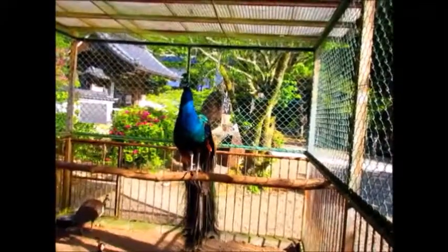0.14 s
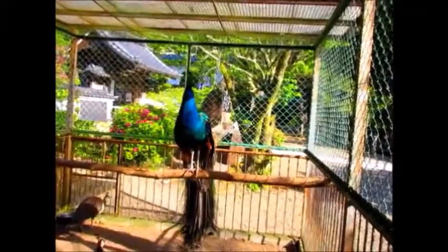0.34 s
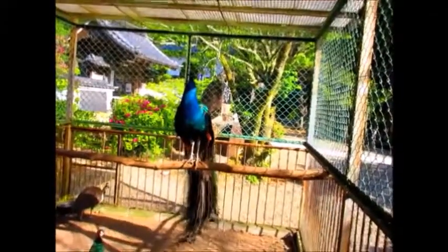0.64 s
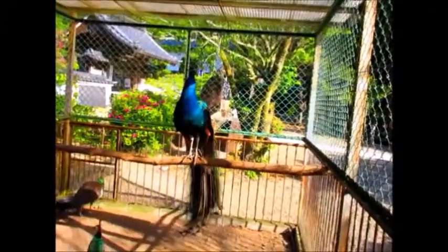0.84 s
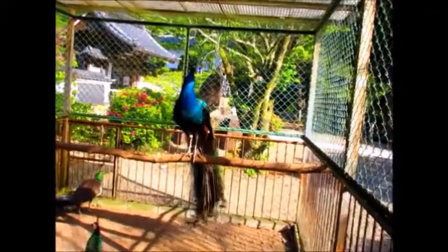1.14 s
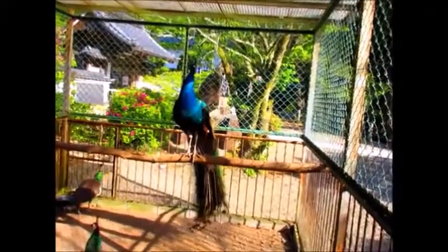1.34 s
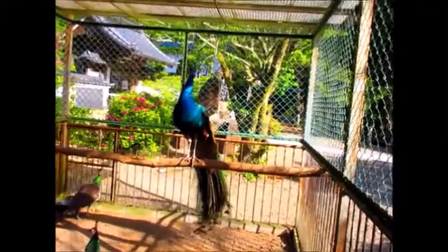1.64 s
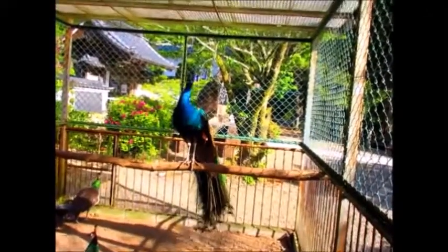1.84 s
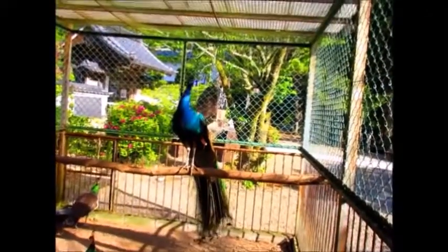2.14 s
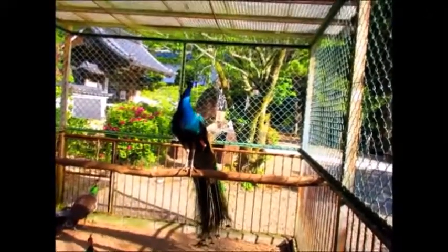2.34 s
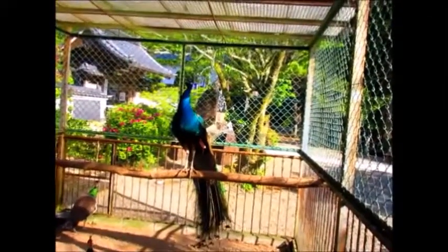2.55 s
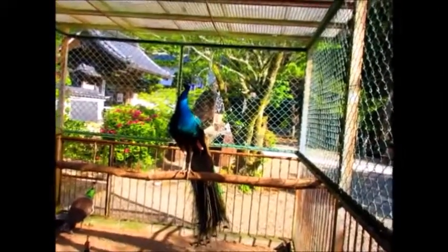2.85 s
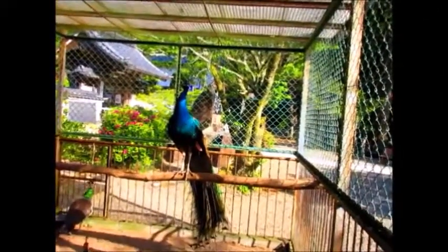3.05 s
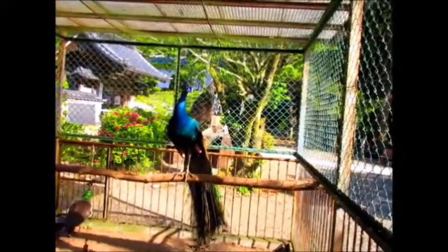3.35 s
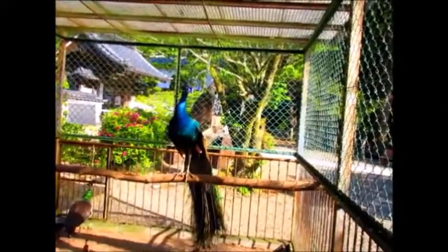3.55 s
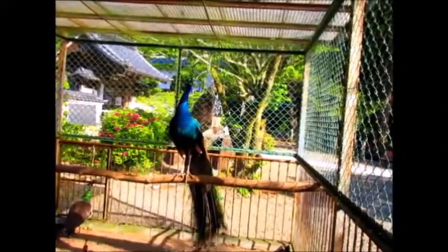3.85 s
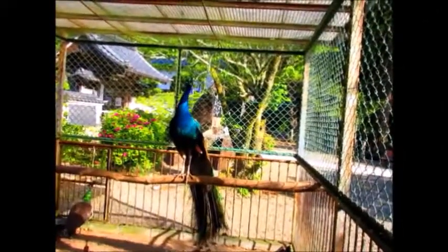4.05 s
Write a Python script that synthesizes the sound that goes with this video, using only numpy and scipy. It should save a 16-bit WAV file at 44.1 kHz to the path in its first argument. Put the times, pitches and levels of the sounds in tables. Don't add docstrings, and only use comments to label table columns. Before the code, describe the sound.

A peacock in a wire aviary clucks twice as claws knock on wood, gives a short warbling call, then two long piercing screams.

```python
import sys
import numpy as np
from scipy import signal
from scipy.io import wavfile

SR = 44100
rng = np.random.default_rng(int(sys.argv[2]) if len(sys.argv) > 2 else 0)


def store_pcm(level_fs):
    pcm = np.round(np.clip(level_fs, -1, 1) * 32767).astype(np.int16)
    wavfile.write(sys.argv[1], SR, np.atleast_2d(pcm).T)


def magnitude_from_level(level_db):
    exponent = np.asarray(level_db, float) / 20
    return 10 ** exponent


N = 185440

# start t/s, end t/s
CALL_TIMES = [
    (0.765, 1.085),
    (1.36, 2.13),
    (2.955, 3.76),
]


def at_hz(points, hz):
    f, level_db = np.transpose(points)
    return np.interp(np.log(hz), np.log(f), level_db)


def band(x, low_hz, high_hz):
    edges_hz = [low_hz, min(high_hz, .45 * SR)]
    return signal.sosfilt(signal.butter(2, edges_hz, "band", fs=SR, output="sos"), x)


def rms_one(x):
    return x / np.sqrt(np.mean(x ** 2) + 1e-20)


def drift(rate_hz, size, count=1):
    r = np.exp(-64 * np.pi * rate_hz / SR)
    coarse = rng.standard_normal((count, size // 32 + 402))
    slow = signal.lfilter([1], [1, -2 * r, r * r], coarse)[:, 400:]
    slow *= np.sqrt((1 - r * r) ** 3 / (1 + r * r))
    t = np.arange(size) / 32
    return np.squeeze([np.interp(t, np.arange(len(v)), v) for v in slow])


def ramp(t, start, length):
    return np.clip((t - start) / length, 0, 1)


def dying(t, t60):
    return np.exp(-np.log(1000) * t / np.clip(t60, .005, 1.8))


def recorder_gain_db():
    quiet_db, loud_db, duck_db, duck_time_s = -47.5, -61, -5, .3
    t = np.arange(N) / SR
    busy = sum((t > start) & (t < end) for start, end in CALL_TIMES)
    r = np.exp(-1 / (duck_time_s * SR))
    ducking = duck_db * signal.lfilter([1 - r], [1, -r], busy)
    return quiet_db + (loud_db - quiet_db) * ramp(t, start=.5, length=0.23) + ducking


def hum():
    # f/Hz, level/dB per Hz
    spectrum = [(18, -62.5), (30, -32), (59, -7.5), (92, -11), (320, -8), (698, -21), (953, -15),
                (1300, -18), (1560, -13.5), (2920, -24), (4200, -29), (7240, -35.5), (15000, -50)]
    # f/Hz, width/Hz, level over the hum/dB, fading time/s
    motor = [
        (62, 12, -2.5, 30.),
        (120, 7.2, 12, 0.85),
    ]
    out = 0
    edges = 25 * 2 ** np.arange(0, 9.6, .5)
    white = rng.standard_normal((2, N))
    for k, (low, high) in enumerate(zip(edges, edges[1:])):
        level_db = at_hz(spectrum, np.sqrt(low * high)) + 2.4 * drift(5, size=N)
        out = out + magnitude_from_level(level_db) * band(white[k % 2], low, high)
    for hz, width_hz, over_db, fading_s in motor:
        fade = np.exp(-np.arange(N) / SR / fading_s)
        tone = band(rng.standard_normal(N), hz - width_hz / 2, hz + width_hz / 2)
        out = out + magnitude_from_level(at_hz(spectrum, hz) + over_db) * fade * tone
    out = band(out, 48, 17000)
    return magnitude_from_level(recorder_gain_db() + 5.0) * rms_one(out)


def clucks():
    # t/s, length/s, f/Hz, second partial level/dB, third partial level/dB
    puffs = [
        (.309, 0.019, 614, -14.5, -31.5),
        (0.347, 0.0084, 592, -5, -22.5),
        (0.354, 0.01, 623, -21.5, -38),
        (0.598, 0.013, 667, -4, -12),
        (0.614, 0.0068, 690, -7, -18),
        (0.619, 0.023, 633.3, -6.5, -12.5),
    ]
    # f/Hz, level re second partial/dB
    overtones = [(2400, -31), (3200, -39.5), (4200, -29.5), (5500, -44), (8000, -34.5), (11000, -50),
                 (15000, -62)]
    out = np.zeros(N)
    for s, length, hz, second_db, third_db in puffs:
        first_db = -17 + 0.18 * second_db
        u = np.arange(int(1.1 * length * SR)) / SR / length
        phase = 2 * np.pi * np.cumsum(hz * (1 - 0.014 * u)) / SR
        k = np.arange(4, 24)[:, None]
        hoarse = 1.8 * drift(140, size=len(u), count=len(k))
        top = magnitude_from_level(second_db + at_hz(overtones, k * hz)) * np.sin(k * phase + hoarse)
        low = magnitude_from_level(first_db) * np.sin(phase)
        low += magnitude_from_level(second_db) * np.sin(2 * phase)
        low += magnitude_from_level(third_db) * np.sin(3 * phase)
        puff = np.clip(u / 0.15, 0, 1) * np.clip((1.5 - u) / 1.1, 0, 1)
        puff *= np.clip((u[-1] - u) / .18, 0, 1)
        out[round(s * SR):][:len(u)] += puff * (low + top.sum(axis=0))
    return out


def knocks():
    # t/s, peak level/dB, centre f/Hz, width/octaves, t60/s
    impacts = [
        (0.309, -34, 8350, 0.35, 0.066),
        (0.345, -33.5, 6500, 1.1, 0.013),
        (.475, -40.5, 3080, 0.64, 0.04),
        (.543, -8, 2190, 1.96, 0.061),
        (0.546, -20, 460, 2.6, 0.14),
        (0.592, -20, 3720, 0.77, 0.041),
        (.600, -11.5, 2805, 0.52, 0.056),
        (.601, -21, 7760, 0.8, 0.09),
        (0.744, -24.5, 1410, 1.34, 0.053),
    ]
    out = np.zeros(N)
    t = np.arange(4000) / SR
    for s, peak_db, hz, width, t60 in impacts:
        half_width = 2 ** (width / 2)
        crack = rms_one(band(rng.standard_normal(len(t)), hz / half_width, hz * half_width))
        envelope = dying(t, t60) * np.minimum(t / 0.0027, 1)
        out[round(s * SR):][:len(t)] += magnitude_from_level(peak_db - 1) * envelope * crack
    return out


def glide(t, rows):
    s, v = np.transpose(rows)
    step = np.diff(v) / np.diff(s)
    a, b = np.r_[step[0], step], np.r_[step, step[-1]]
    slope = np.where(a * b > 0, 2 * a * b / (a + b + 1e-9), 0)
    i = np.clip(np.searchsorted(s, t) - 1, 0, len(s) - 2)
    h = s[i + 1] - s[i]
    u = np.clip((t - s[i]) / h, 0, 1)
    bend = (slope[i] - step[i]) * (1 - u) - (slope[i + 1] - step[i]) * u
    return v[i] + h * (step[i] * u + u * (1 - u) * bend)


def share(level_db, colour_db):
    height = magnitude_from_level(colour_db)
    return height * magnitude_from_level(level_db) / np.sqrt(np.sum(height ** 2, axis=0))


def call(span, pitch, effort, warble):
    # f/Hz, level/dB
    first_colour = [(580, -30.5), (630, -24.5), (652, -37), (690, -21.5), (735, -27), (760, -24),
                    (790, -17.5), (810, -19)]
    second_colour = [(1160, -23), (1265, -18), (1305, -25), (1375, -18), (1455, -10), (1515, -18),
                     (1565, -12), (1600, -20)]
    third_colour = [(1750, -28.5), (1900, -20), (2010, -18.5), (2090, -29), (2190, -29), (2300, -22.5),
                    (2400, -23)]
    # f/Hz, level/dB
    beak = [(2300, -31.5), (3200, -13), (4000, -19.5), (4800, -1), (5600, 0), (6500, -5), (8000, -1.5),
            (9500, -5.5), (12000, -10), (13600, -14.5), (15300, -24)]
    # f/Hz, level/dB
    resonance = [(2200, 17), (2700, -1.5), (3300, -0.5), (3700, -12), (4200, -24), (15500, -81)]
    t = np.arange(round(span[0] * SR), round(span[1] * SR)) / SR
    size, age, end = len(t), t - t[0], t[-1]
    s, level, opening = np.transpose(effort)
    opening = np.interp(t, s, opening)
    level = np.interp(t, s, level)
    level += -19.5 * (1 - ramp(t, t[0], .012))
    level += -9.5 * ramp(t, end - 0.014, 0.014)
    bright = level + -32 + (-20.5 + 32) * opening
    throat = 19.5 + (-22 - 19.5) * opening

    rate_hz, swing_hz, swing_db = warble
    settling = np.exp(-age / 0.046)
    flutter = np.sin(2 * np.pi * rate_hz * age - 1.7 + 0.24 * drift(7.9, size=size))
    flutter *= 1 + 1.4 * settling
    path = glide(t, pitch) - 62.7 * ramp(t, end - .022, .022)
    hz = path + swing_hz * flutter
    phase = 2 * np.pi * np.cumsum(hz) / SR

    first = level + at_hz(first_colour, path)
    second = level + at_hz(second_colour, 2 * path)
    second += 6 * swing_db * settling
    third = level + at_hz(third_colour, 3 * path)
    third += -10 * ramp(age / (end - t[0]), 0.51, 0.1)
    third += (21.4 - 4 * swing_db) * np.exp(-((end - .017 - t) / 0.017) ** 2)
    low = magnitude_from_level(first) * np.sin(phase) + magnitude_from_level(second) * np.sin(2 * phase) + magnitude_from_level(third) * np.sin(3 * phase)

    k = np.arange(4, 27)[:, None]
    sway = 4.5 * drift(8.6, size=size, count=len(k))
    sway += 5 * (1 - opening) ** 2 * drift(28, size=size, count=len(k))
    shape = share(bright, at_hz(beak, k * hz) + sway)
    shape += share(bright + throat, at_hz(resonance, k * hz) + 1.1 * sway)
    shape *= magnitude_from_level(1.1 * swing_db * flutter) * (k * hz < 15300)
    top = np.sum(shape * np.sin(k * phase + rng.uniform(0, 0.98, k.shape)), axis=0)
    strain_db = 9 * np.tanh(np.abs(np.gradient(path)) * SR / 1200)
    rasp = rms_one(band(rng.standard_normal(size), 40, 750))
    top *= 1 + magnitude_from_level(-33.5 + strain_db + 9 * swing_db) * rasp

    voiced = np.sqrt(2) * (low + top)
    half_lines = band(np.sin(phase / 2) * voiced, 1700, 9000)
    uneven = magnitude_from_level(-40 + 1.3 * drift(18, size=size)) * half_lines
    breath = magnitude_from_level(-46) * rms_one(band(rng.standard_normal(size), 55, 390)) * voiced
    edge = np.clip(np.minimum(age, end - t) / 0.0035, 0, 1)
    return (voiced + uneven + breath) * magnitude_from_level(swing_db * flutter) * edge


def calls():
    # t/s, f/Hz
    pitches = [
        [(0.765, 695), (0.777, 652.4), (0.795, 697.4), (0.875, 717.2), (0.949, 722), (1.085, 678)],
        [(1.36, 573.7), (1.426, 633.3), (1.472, 655), (1.53, 644.6), (1.577, 730.3), (1.69, 768), (1.83, 794.6),
         (1.99, 777.2), (2.13, 648.6)],
        [(2.955, 572), (3.043, 675), (3.081, 695.2), (3.146, 649.4), (3.192, 747), (3.283, 790.1),
         (3.39, 800.2), (3.6, 777.5), (3.76, 649.5)],
    ]
    # t/s, level/dB, beak opening/0-1
    efforts = [
        [(0.775, 3.5, 0.4), (0.813, -1.5, .35), (0.895, -1, 0.3), (1.04, -2.5, .35), (1.085, -1.5, .2)],
        [(1.374, -0.6, 0.06), (1.464, 2, 0.12), (1.542, -3, .1), (1.574, 0.5, 0.7), (1.65, 1.36, .9),
         (1.92, 0.2, .85), (2.056, -1.5, .45), (2.13, -2.5, .2)],
        [(2.969, -3.5, 0.11), (3.06, 0, 0), (3.149, -3, .08), (3.185, -0.5, 0.52), (3.245, -0.94, .95),
         (3.52, 1.24, .95), (3.675, -3.5, .45), (3.76, -3, 0.1)],
    ]
    # rate f/Hz, pitch swing/Hz, level swing/dB
    warbles = [
        (38.68, 11, 1.5),
        (30, 0.29, 0.19),
        (29.99, 0.45, 0.15),
    ]
    out = np.zeros(N)
    for span, pitch, effort, warble in zip(CALL_TIMES, pitches, efforts, warbles):
        sound = call(span, pitch, effort, warble)
        out[round(span[0] * SR):][:len(sound)] += sound
    return out


def finch():
    start_s, length_s, start_hz, end_hz, level_db = 4.035, .018, 3951, 3549.5, -61
    out = np.zeros(N)
    size = int(length_s * SR)
    phase = 2 * np.pi * np.cumsum(np.linspace(start_hz, end_hz, size)) / SR
    out[round(start_s * SR):][:size] = magnitude_from_level(level_db) * np.hanning(size) * np.sin(phase)
    return out


def echoes(db, start, t60, low_hz, high_hz):
    t = np.arange(2 * SR) / SR
    tail = band(rng.standard_normal(len(t)), low_hz, high_hz) * dying(t, t60) * (t > start)
    direct = np.sum(band(1. * (t == 0), low_hz, high_hz) ** 2)
    return magnitude_from_level(db) * tail * np.sqrt(direct / np.sum(tail ** 2))


def scene():
    roof = echoes(db=-9, start=0.02, t60=0.2, low_hz=501.5, high_hz=2250)
    mesh = echoes(db=-5, start=-0.0059, t60=0.1284, low_hz=2300, high_hz=15001.5)
    yard = echoes(db=-32, start=0.05, t60=1.2, low_hz=1329.5, high_hz=1750)
    response = roof + mesh
    response[0] += 1
    wall = 1. * (np.arange(len(response)) == int(0.11 * SR))
    response += magnitude_from_level(-36) * band(wall, 500, 3000)
    bird = calls() + clucks() + knocks()
    near = signal.fftconvolve(bird, response)[:N]
    stirred = bird * drift(30, size=N)
    far = signal.fftconvolve(stirred, yard)[:N]
    return (near + far + finch() + hum())[None]


def band_limit(x):
    return signal.sosfilt(signal.butter(12, 16390, fs=SR, output="sos"), x)


def record(dry):
    mix = np.clip(dry, -1, 1)
    return band_limit(mix)


dry = scene()
out = record(dry)
store_pcm(out)
```